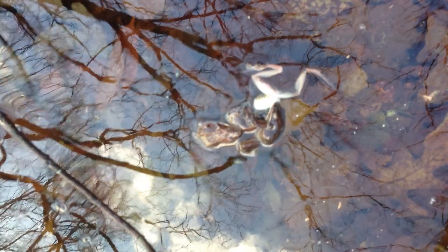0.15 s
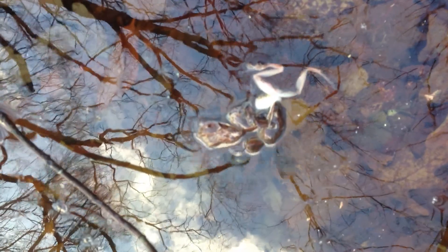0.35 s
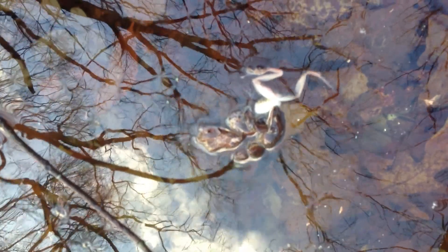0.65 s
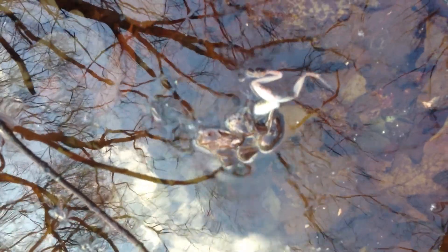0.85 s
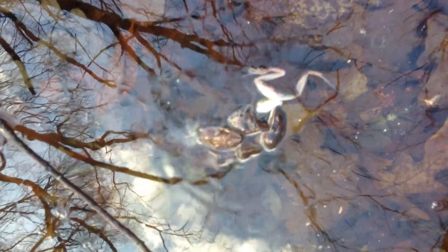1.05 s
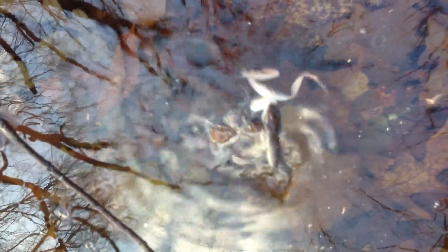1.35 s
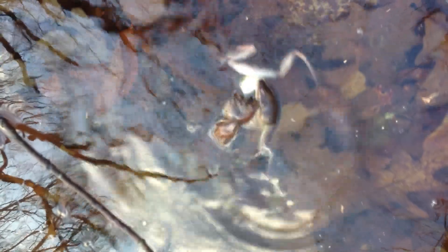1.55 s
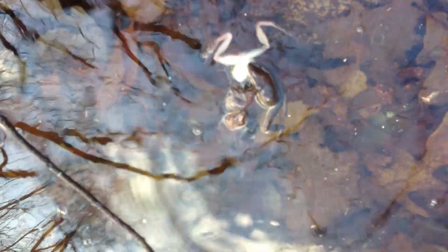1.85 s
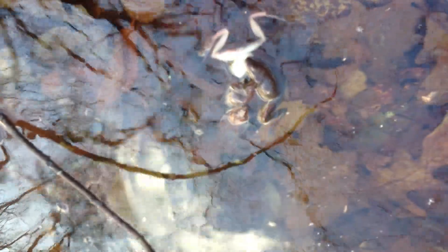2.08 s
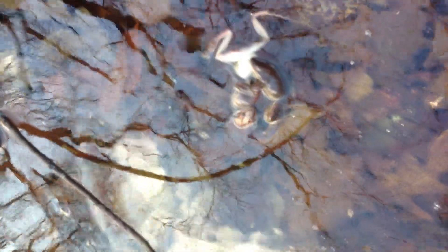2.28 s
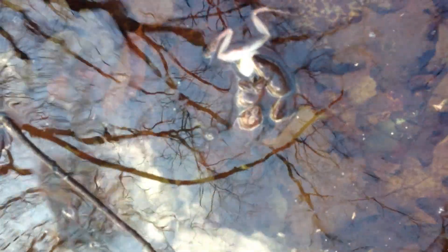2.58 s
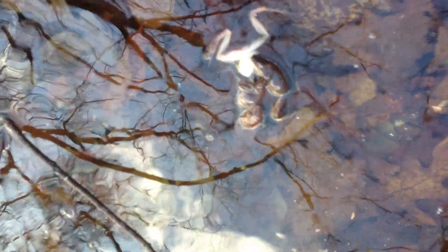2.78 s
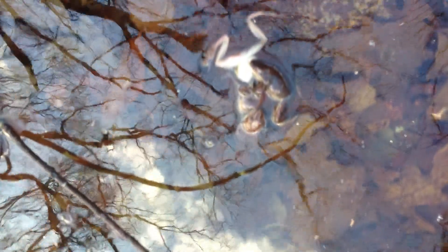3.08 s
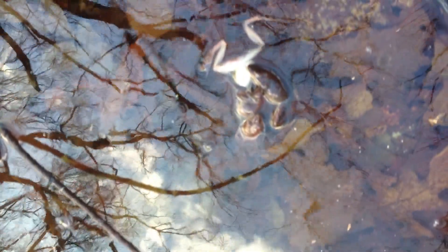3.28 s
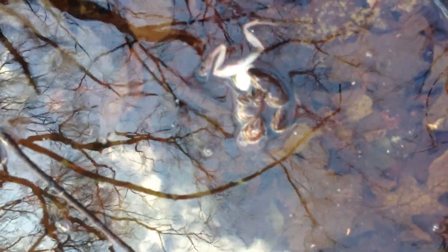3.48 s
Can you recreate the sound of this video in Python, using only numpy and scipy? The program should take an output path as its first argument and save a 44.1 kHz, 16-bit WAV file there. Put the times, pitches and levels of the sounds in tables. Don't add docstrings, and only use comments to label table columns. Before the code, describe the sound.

Frogs quack in a dense, overlapping chorus around a shallow woodland pool, with faint hiss.

```python
import sys
import numpy as np
from scipy import signal
from scipy.fft import rfft, irfft
from scipy.io import wavfile
from scipy.ndimage import uniform_filter1d

SR = 44100
rng = np.random.default_rng(int(sys.argv[2]) if len(sys.argv) > 2 else 0)


def invert_db(level):
    return 10 ** (np.asarray(level, dtype=float) / 20)


def waveform_to_disk(signal):
    frames = np.transpose(np.atleast_2d(signal))
    scaled = np.clip(frames, -1, 1) * 32767
    samples = np.round(scaled).astype(np.int16)
    wavfile.write(sys.argv[1], SR, samples)


N = 160083

SPOTS = 8
ECHO_DB, NEAR_ECHO_DB, CLOSE_ECHO_DB = -5.5, -9.5, -13.0
SAC_WIDTH_HZ = 250


def coloured(points):
    hz, db = np.transpose(points)
    grid = np.fft.rfftfreq(N, 1 / SR) + 1
    gain = invert_db(np.interp(np.log(grid), np.log(hz), db, right=-90))
    x = irfft(rfft(rng.standard_normal(N)) * gain, N)
    return x / x.std()


def add(track, s, sound):
    i = int(s * SR) + np.arange(len(sound))
    ok = (i >= 0) & (i < N)
    track[i[ok]] += sound[ok]


def highpass(x, order, hz):
    return signal.sosfilt(signal.butter(order, hz, "high", fs=SR, output="sos"), x)


def resonance(x, hz, width_hz):
    radius = np.exp(-np.pi * width_hz / SR)
    turn = 2 * np.pi * hz / SR
    b, a = [0, np.sin(turn)], [1, -2 * radius * np.cos(turn), radius * radius]
    once = signal.lfilter(b, a, x + 1e-18)
    return 4 * (1 - radius) * signal.lfilter(b, a, once)


def pulses(rate, luck):
    cycle = np.cumsum(rate) / SR + luck[0]
    cycle += 0.07 * np.interp(cycle, np.arange(32), luck[32:])
    starts = np.diff(np.floor(cycle), prepend=0) > 0
    spread_db = 2.0 * luck[np.clip(cycle, 0, 31).astype(int)]
    return starts * invert_db(spread_db)


def woods(spots, echo_db):
    t60_s, cut_hz = 0.63, 11700
    t = np.arange(int(0.3 * SR)) / SR
    tail = rng.standard_normal((len(spots), len(t))) * invert_db(-60 * t / t60_s) * (t > 0.008)
    tail = signal.lfilter(*signal.butter(1, cut_hz, fs=SR), tail)
    tail /= np.sqrt(np.sum(tail ** 2, axis=1, keepdims=True))
    echoes = signal.fftconvolve(spots, tail, axes=1)[:, :N]
    return np.sum(spots + invert_db(echo_db) * echoes, axis=0)


# (pitch [Hz], width [Hz], level [dB])
THROAT_RESONANCES = [(825, 195, -9), (1292, 357, -9), (2092, 690, -4.5), (2870, 1270, -14.5),
                     (4260, 2800, -20)]


def quacks(rows, echo_db):
    pulses_per_s, slowest_per_s, quicken_per_s2 = 195, 95, 2500
    swell_db_per_s, die_db_per_s = 800, 1103
    sac_rise = 0.03
    out, lead = np.zeros((SPOTS, N)), 0.06
    t = np.arange(int(0.15 * SR)) / SR - lead
    all_luck = rng.standard_normal((len(rows), 64))
    for i, ((s, db, hz, hold), luck) in enumerate(zip(rows, all_luck)):
        own_rate = pulses_per_s * np.exp(0.15 * luck[31])
        rate = np.maximum(own_rate + quicken_per_s2 * np.minimum(t, 0), slowest_per_s)
        swell_db = np.minimum(swell_db_per_s * t, 0)
        die_db = die_db_per_s * np.maximum(t - hold, 0)
        clicks = pulses(rate, luck) * invert_db(db + swell_db - die_db)
        tight = np.clip(t / hold, 0, 1)
        slack_sac = resonance(clicks * (1 - tight), hz * (1 - sac_rise), SAC_WIDTH_HZ)
        tight_sac = resonance(clicks * tight, hz * (1 + sac_rise), SAC_WIDTH_HZ)
        voice = slack_sac + tight_sac
        for k, (throat_hz, width_hz, throat_db) in enumerate(THROAT_RESONANCES):
            own_gain = invert_db(throat_db + 2.08 * luck[20 + k])
            own_hz = throat_hz * (1 + 0.067 * luck[25 + k])
            voice += (-1) ** k * own_gain * resonance(clicks, own_hz, width_hz)
        add(out[i % SPOTS], s - lead, voice)
    return highpass(woods(out, echo_db), 4, 560)


# (frequency [Hz], level [dB])
HISS_SPECTRUM = [(2060, -29), (3500, -1.5), (4150, -3.5), (5140, -3.5), (6690, -9.5), (14300, -11),
                 (15100, -9)]


def hiss():
    return invert_db(-67) * coloured(HISS_SPECTRUM)


# (frequency [Hz], level [dB])
TRAFFIC_SPECTRUM = [(15, -61), (25, -64), (54, -20), (219, 1.5), (269, 1.5), (317, 7), (419, 0), (520, -29),
                    (680, -18), (1140, -120)]


def traffic():
    level_db, flicker_db, flickers_per_s = -65, 3, 14
    flicker = np.interp(np.arange(N) / SR * flickers_per_s, np.arange(80), rng.standard_normal(80))
    return invert_db(level_db + flicker_db * flicker) * coloured(TRAFFIC_SPECTRUM)


# (time [s], peak level [dB], pitch [Hz], width [Hz])
LEAF_TICKS = [
    (3.2215, -52, 6100, 3200),
    (3.263, -60, 9500, 1800),
    (3.308, -50, 4400, 1200),
    (1.045, -63, 9720, 1500),
    (3.308, -60, 6500, 3000),
]


def leaves():
    out = np.zeros(N)
    gap_s = 0.0011
    snaps = 1. * np.isin(np.arange(400), [0, int(gap_s * SR)])
    for s, db, hz, width_hz in LEAF_TICKS:
        add(out, s, invert_db(db) * resonance(snaps, hz, width_hz))
    return highpass(out, 2, 250)


# (time [s], level [dB], start pitch [Hz], end pitch [Hz], length [s])
POOL_BUBBLES = [
    (1.218, -35.5, 690, 690, .024),
    (1.406, -38.5, 550, 620, .03),
    (1.424, -33, 640, 700, .025),
]


def bubbles():
    out = np.zeros(N)
    throbs_per_s, throb_depth = 120, 0.55
    for s, db, hz, end_hz, length in POOL_BUBBLES:
        u = np.arange(int(length * SR)) / (length * SR)
        throb = 1 + throb_depth * np.sin(2 * np.pi * (1 - u) * length * throbs_per_s)
        swell = u ** 0.56 * (1 - u ** 10.0)
        cycles = length * (hz * u + (end_hz - hz) * u ** 2 / 2)
        add(out, s, invert_db(db) * throb * swell * np.sin(2 * np.pi * cycles))
    return highpass(out, 2, 250)


# (time [s], level [dB])
CROWD_LEVEL = [(0.0, -39), (0.3, -40.5), (0.53, -39.5), (0.87, -42.5), (1.1, -39), (1.38, -38.5),
               (1.6, -41), (1.9, -40), (2.2, -42), (2.32, -38), (2.42, -43), (2.55, -42.5), (2.76, -40.5),
               (2.83, -44.5), (2.98, -40.5), (3.17, -44.5), (3.42, -39), (3.63, -38)]


def crowd():
    count, sac_hz, hold_s, dull_hz = 340, 1690, 0.016, 2210
    luck = rng.standard_normal((count, 3))
    s = (np.arange(count) + luck[:, 0] / 2) * N / SR / count
    db = np.interp(s, *np.transpose(CROWD_LEVEL)) - 0.5 + 2.5 * luck[:, 1]
    hz = sac_hz * np.exp(0.05 * luck[:, 2])
    far = quacks(np.transpose([s, db, hz, 0 * s + hold_s]), ECHO_DB)
    return signal.lfilter(*signal.butter(1, dull_hz, fs=SR), far)


# (time [s], rms level [dB], start pitch [Hz], length [s], slide [Hz/s])
CALL_WHISTLES = [(0.275,-70.5,5570,0.12,2),(0.342,-69,5690,0.07,-9000),(0.406,-72,6100,0.024,-14000),(.43,-68,5320,0.053,0),(0.542,-72,4970,0.047,0),(.63,-72,4960,0.053,-6),
                 (0.772,-70.5,4500,0.022,10),(1.202,-71.5,5580,0.024,-2),(1.265,-64,6000,0.079,-14000),(1.318,-56.5,4800,0.016,-1000),(1.36,-80,5460,0.11,-3000),(1.702,-73,5430,0.059,2),
                 (1.996,-71,4750,0.055,-6000),(2.462,-72,4870,.06,0),(2.602,-70,5150,.06,3000),(2.73,-76,5500,.05,-28),(3.053,-69,5200,0.047,0),(3.314,-64,4580,0.039,12),(3.392,-70.5,5030,0.051,5000),
                 (0.929,-74,4900,.04,0),(1.04,-74,4800,.04,2),(1.637,-74,4500,.03,0),(2.28,-74.5,5200,.06,2),(3.52,-71,4800,.05,0)]


def whistles():
    pulses_per_s, width_hz, wobble_hz = 105, 140, 90
    out = np.zeros(N)
    all_luck = rng.standard_normal((len(CALL_WHISTLES), 64))
    for (s, db, hz, length, slide), luck in zip(CALL_WHISTLES, all_luck):
        t = np.arange(int((length + 0.01) * SR)) / SR
        rate = pulses_per_s + 9000 * t * (length < 0.03)
        swell = np.sin(np.pi * np.clip(t / length, 0, 1)) ** 0.25
        clicks = pulses(rate, luck) * swell
        ringing = signal.lfilter([1], [1, -np.exp(-np.pi * width_hz / SR)], clicks)
        ringing = uniform_filter1d(ringing, size=20)
        pitch = hz + slide * t + wobble_hz * np.interp(t * 300, np.arange(32), luck[32:])
        tone = np.sin(2 * np.pi * np.cumsum(pitch) / SR)
        add(out, s, invert_db(db + 13.0) * ringing * tone)
    return woods(out[None], NEAR_ECHO_DB)


# (time [s], peak level [dB])
LONE_CLUCKS = [
    (.904, -37),
    (0.916, -41),
    (.930, -29),
    (.935, -26),
    (0.946, -32),
]


def clucks():
    clicks = np.zeros(N)
    s, db = np.transpose(LONE_CLUCKS)
    clicks[(s * SR).astype(int)] = invert_db(db)
    near = woods(resonance(clicks, 1670, 380)[None], CLOSE_ECHO_DB)
    return highpass(near, 4, 560)


# (start [s], end [s], pulse rate [1/s], start level [dB], end level [dB], sac pitch [Hz])
CLOSE_CALL_PARTS = [
    (1.2735, 1.319, 102, -41, -29, 1650),
    (1.315, 1.341, 340, -28, -35, 2144),
]
# (pitch [Hz], width [Hz], level [dB])
HEAD_RESONANCES = [(850, 250, -13), (2800, 800, -9), (3500, 900, -20)]


def closest_frog():
    out = np.zeros(N)
    jitter_s, spread_db = 0.0003, 2
    all_luck = rng.standard_normal((len(CLOSE_CALL_PARTS), 64))
    for (s, end_s, rate, start_db, end_db, hz), luck in zip(CLOSE_CALL_PARTS, all_luck):
        beats = np.arange(0, end_s - s, 1 / rate)
        count = len(beats)
        moments = np.abs(beats + jitter_s * luck[32:32 + count])
        glide_db = start_db + (end_db - start_db) * beats / (end_s - s)
        clicks = np.zeros(int(0.1 * SR))
        clicks[(moments * SR).astype(int)] = invert_db(glide_db + spread_db * luck[:count])
        voice = resonance(clicks, hz, SAC_WIDTH_HZ)
        for head_hz, width_hz, head_db in HEAD_RESONANCES:
            voice -= invert_db(head_db) * resonance(clicks, head_hz, width_hz)
        add(out, s, voice)
    return highpass(woods(out[None], CLOSE_ECHO_DB), 4, 560)


# (time [s], peak level [dB], sac pitch [Hz],
# hold [s])
NEAR_QUACKS = [(0.004, -32, 1660, 0.019), (0.062, -37, 1670, 0.043), (0.295, -32.5, 1850, 0.0083),
               (0.374, -27, 1700, 0.018), (0.473, -30, 1760, 0.0058), (0.56, -29.5, 1696, 0.0077),
               (0.635, -39, 1600, 0.03), (0.696, -31.5, 1420, 0.0083), (0.8, -32.5, 1500, 0.015),
               (1.013, -29.5, 1680, 0.011), (1.059, -41, 1620, 0.041), (1.484, -32, 1860, 0.005),
               (1.539, -47, 1590, 0.0083), (1.632, -33, 1570, 0.023), (1.734, -33, 1600, 0.0091),
               (1.848, -33.5, 1520, 0.042), (2.004, -45, 1660, 0.024), (2.112, -40, 1500, 0.0091),
               (2.307, -40.5, 1770, 0.019), (2.481, -34.5, 1730, 0.04), (2.57, -30.5, 1490, 0.018),
               (2.634, -32.5, 1875, 0.027), (2.86, -34.5, 1690, 0.018), (2.973, -31.5, 1720, 0.0051),
               (3.081, -33, 1890, 0.01), (3.113, -37, 1450, 0.023), (3.338, -35, 1700, 0.015),
               (3.393, -35.5, 1650, 0.055),
               (.665, -33, 2330, 0.022), (1.222, -35.5, 1190, 0.03), (1.703, -34, 2350, 0.028),
                    (1.932, -31.5, 2040, 0.013), (3.04, -43, 2160, 0.013), (4, -41, 1290, 0.048),
                    (3.53, -36, 1950, 0.017), (3.592, -31.5, 1610, 0.038), (2.026, -28.5, 1630, 0.005),
                    (0.27, -31, 1500, 0.0041), (3.338, -35.5, 910, 0.0067), (3.41, -35, 1650, 0.06),
                    (2.8, -54, 1300, 0.008), (2.655, -37.5, 1180, 0.019), (2.76, -35.5, 1440, 0.046),
                    (2.88, -31.5, 1370, 0.0059), (3.46, -38, 1790, 0.022), (3.23, -41.5, 1600, 0.032),
                    (0.096, -41, 1130, 0.028), (.22, -35.5, 1900, 0.021), (.385, -32, 1720, .01),
                    (.65, -35, 1550, .05), (3.345, -34, 1700, .02), (1.87, -34, 1650, .02),
                    (1.715, -37, 2150, .015), (2.117, -37, 1600, .015)]


def near_frogs():
    return invert_db(-1.5) * quacks(NEAR_QUACKS, NEAR_ECHO_DB)


def scene():
    background = hiss() + traffic() + leaves() + bubbles()
    frogs = crowd() + whistles() + clucks() + closest_frog() + near_frogs()
    return (background + frogs)[None]


def roll_off(x):
    return signal.sosfilt(signal.butter(12, 15310, fs=SR, output="sos"), x)


def record(dry):
    fade = np.minimum(np.arange(N)[::-1] / 100, 1)
    return roll_off(dry * fade)


dry = scene()
out = record(dry)
waveform_to_disk(out)
```